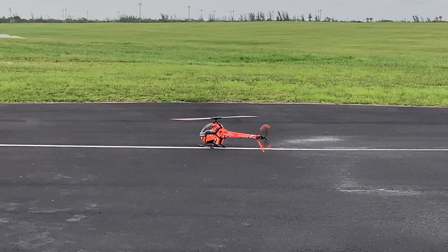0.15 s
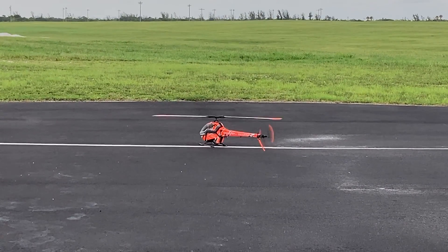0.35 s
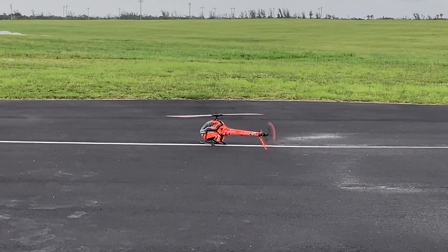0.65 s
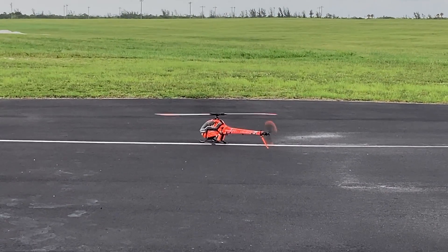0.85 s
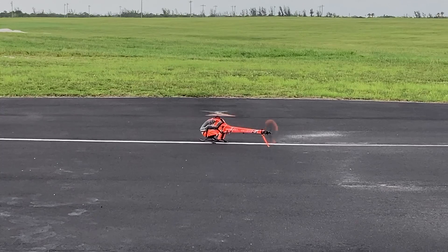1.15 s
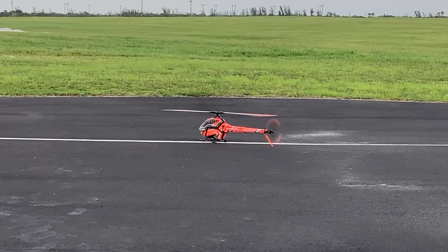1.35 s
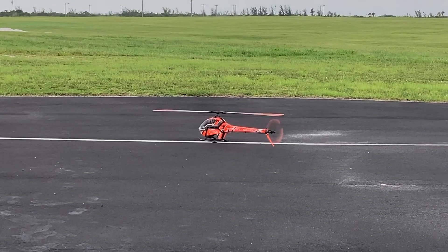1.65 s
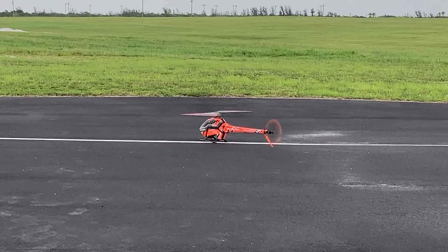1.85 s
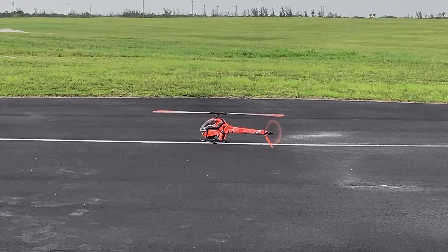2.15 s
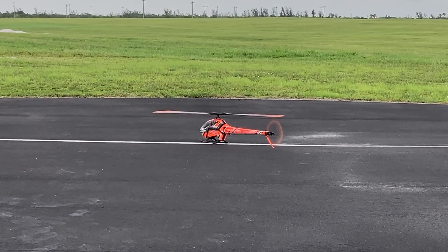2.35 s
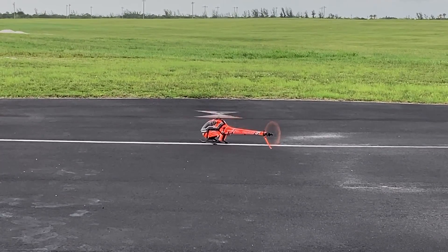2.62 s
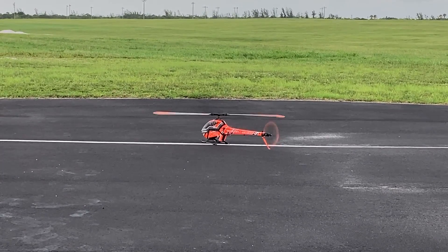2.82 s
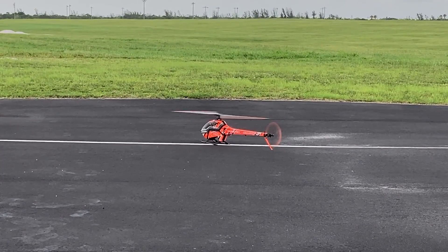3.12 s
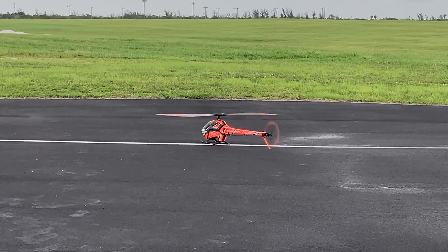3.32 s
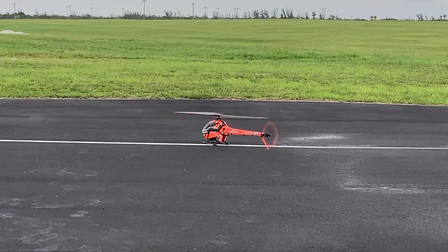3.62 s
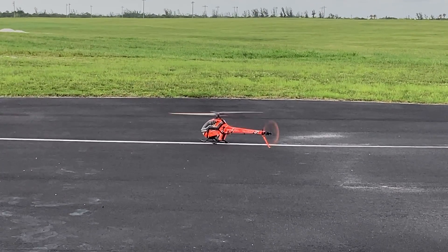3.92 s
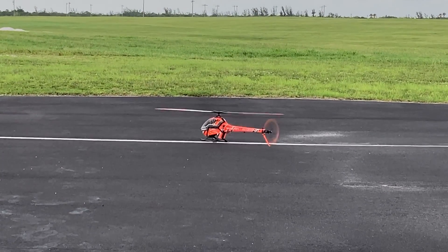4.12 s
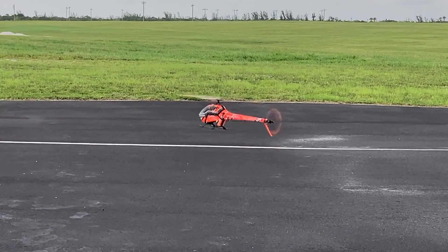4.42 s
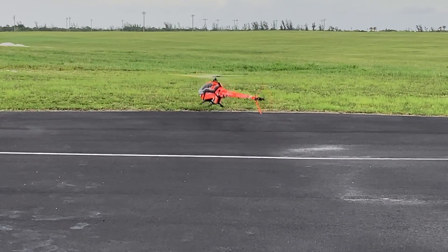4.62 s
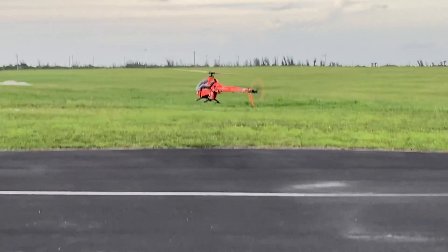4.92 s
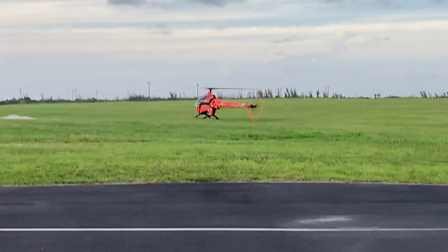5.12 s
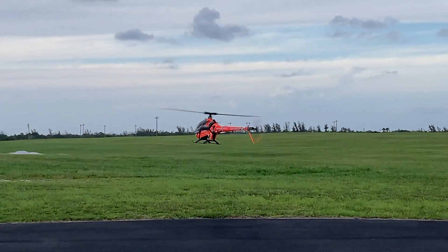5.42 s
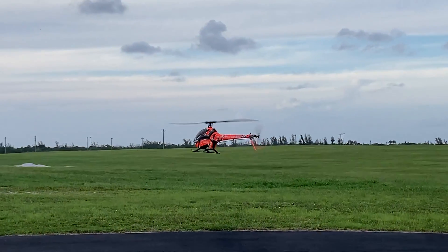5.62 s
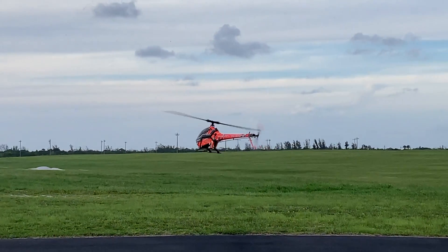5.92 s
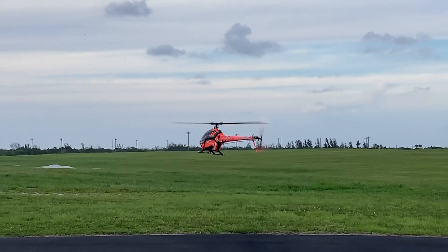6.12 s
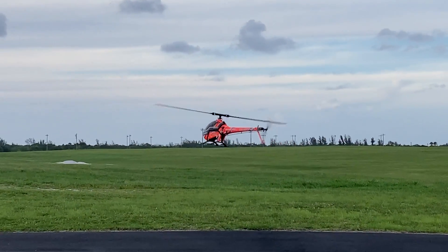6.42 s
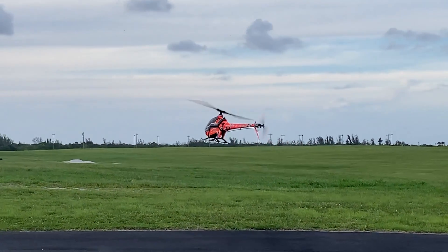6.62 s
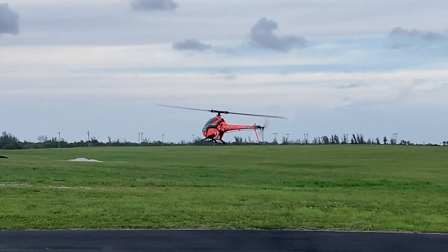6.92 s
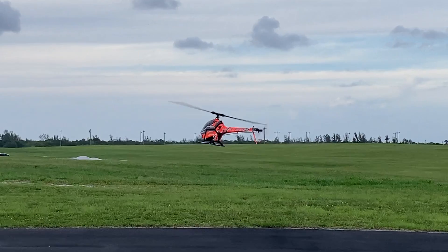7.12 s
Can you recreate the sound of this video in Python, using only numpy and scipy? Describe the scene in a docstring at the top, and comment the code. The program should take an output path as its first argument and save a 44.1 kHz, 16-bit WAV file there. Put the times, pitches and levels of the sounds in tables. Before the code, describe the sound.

Outdoors on an open, windy airfield, a small electric helicopter spools up several metres away. Its motor and gear whine climbs in pitch while whistling blades and airy hiss grow. Just after four seconds it lifts off with a harsh, growling surge, then holds a steady whine with fluttering blade chop. Wind rumbles, flutters and pops on the small stereo microphone throughout.

```python
"""On a windy airfield an electric model helicopter spools up on the tarmac, lifts off and hovers.
Motor, pinion and tail drive whine as sines at multiples of the motor speed.
The two main blades whistle as Doppler-swung narrow noise; wash, growl, rasp and hiss are coloured noise.
Gusts rumble, flutter and pop as enveloped noise on the two ports of a small microphone."""
import sys
import numpy as np
from scipy import signal
from scipy.fft import rfft, irfft, next_fast_len
from scipy.io import wavfile
from scipy.ndimage import uniform_filter1d, map_coordinates

SR = 44100
rng = np.random.default_rng(int(sys.argv[2]) if len(sys.argv) > 2 else 0)


def file_out(sig):
    """Save sig as 16-bit WAV at sys.argv[1]."""
    # one column per channel
    cols = np.atleast_2d(sig).T
    # limit, then scale
    lim = np.clip(cols, -1, 1)
    pcm = np.round(lim * 32767).astype(np.int16)
    wavfile.write(sys.argv[1], SR, pcm)


N = 320166

# All levels are relative: trims and random swings are added where they are used.
# Gusts. Each row: time in seconds, rumble level in dB, flutter in dB over the rumble.
GUSTS = [(0, -19.5, -6.5), (.26, -18.5, -11.5), (.5, -14.5, -2), (.73, -20, -11), (.96, -19.5, -12),
         (1.1, -20.5, -11.5), (1.8, -19.5, -8), (2.5, -18, -10.5), (2.75, -20, -10), (3.1, -15, -4),
         (3.5, -18.5, -6), (3.9, -15, -5), (4.05, -14.5, -0.5), (4.2, -15, 0.5), (4.4, -22.5, 0),
         (4.5, -16, -4), (4.62, -25.5, -4), (4.82, -19, -11), (5.03, -26, -6.5), (5.08, -12.5, -7),
         (5.16, -13.5, 0.5), (5.27, -15, -3), (5.42, -15.5, 6.5), (5.47, -23, -9.5), (5.55, -19, -10),
         (5.96, -18.5, -11.5), (6.44, -24, -1), (6.7, -21, -4), (6.86, -23.5, -12.5), (7.1, -18, 2),
         (7.26, -27.5, -6.5)]
# Single pops of turbulence on the ports. Each row: start in seconds, level in dB, edge in dB over it.
POPS = [(0.2, -12.5, -13), (0.309, -1.5, -28), (0.348, -8, -34), (0.502, -10.5, -34), (0.547, -9, -19),
        (0.809, -8, -39), (0.853, -10.5, -34), (0.904, -9, -38), (1.029, -9.5, -23), (1.051, -16, -14),
        (1.092, -7.5, -13.5), (1.19, -12.5, -22), (1.344, -10.5, -19), (1.584, -6.5, -39),
        (1.836, -13, -10), (1.939, -22.5, -20), (2.092, -13.5, -16), (2.15, -3, -20), (2.371, -9.5, -17),
        (2.482, -10, -16), (2.814, -10.5, -15), (2.862, -9, -33), (2.926, -5.5, -23), (3.16, -10, -7.5),
        (3.316, -13, -5), (3.732, -8, -28), (3.86, -5.5, -15), (3.953, -8, -8), (3.986, -8, -7.5),
        (4.018, -3, -8.5), (4.131, -13, 6.5), (4.145, -7, 1.5), (4.277, -7.5, -13.5), (4.359, -10, -8),
        (4.545, -13.5, -20), (4.751, -8, -12), (4.791, -3.5, -7), (4.818, -7.5, -4), (5.056, -14, -18),
        (5.137, -7.5, -15), (5.195, -11, -23), (5.252, -9, -15), (5.293, -11.5, 2.5), (5.354, -7.5, -18),
        (5.408, -18, 0), (5.855, -12.5, -22), (5.96, -11, -22), (6.421, -20, 3), (6.978, -33.5, 20.5),
        (7.157, -7.5, -5)]
# Wind spectra: rumble, flutter, then low, middle and upper part of a pop.
# Each row: frequency in Hz, density in dB per Hz.
RUMBLE_SPECTRUM = [(12, -41), (20, -18), (47, -4), (75, 4), (300, -17), (390, -27), (660, -120)]
FLUTTER_SPECTRUM = [(90, -23), (170, -2), (300, -4.5), (500, -9.5), (700, -18), (1200, -26)]
THUD_SPECTRUM = [(90, -5.5), (160, -0.5), (280, -3.5), (400, -34)]
SLAP_SPECTRUM = [(200, -23), (330, 3.5), (550, -3), (750, -15), (1000, -17.5)]
EDGE_SPECTRUM = [(600, -2), (1000, 9.5), (1600, 2.5), (2600, -6), (4500, -29)]
# Likeness of the wind at the two ports. Each row: frequency in Hz, likeness from 0 to 1.
WIND_LIKENESS = [(340, 1), (460, 0.98), (610, 0.53), (820, 0.0084)]
QUADRATURE = 0.53  # share of the wind's left-right difference that is a phase shift

# Motor speed. Each row: time in seconds, turns per second.
MOTOR_SPEED = [(0.0, 78.6), (0.36, 87.4), (0.67, 97.6), (1.06, 113.7), (1.3, 117.1), (1.42, 125.3),
               (1.48, 131.3), (1.77, 139.6), (2.1, 143.0), (2.42, 158.1), (2.85, 166.1), (3.38, 192.8),
               (3.75, 203.5), (4.23, 225.0), (4.5, 259.6), (4.68, 261.5), (5.31, 245.9), (5.47, 244.2),
               (5.8, 248.3), (6.2, 244.9), (6.34, 252.3), (7.26, 246.1)]
# Blade load. Each row: time in seconds, load in dB, rasp in dB over its law.
BLADE_LOAD = [(0, -0.5, -2), (.25, 3, 1), (1.3, 2.5, -3), (1.6, 6.5, -5), (2, 2, -2.5), (3.3, 4, -1),
              (4, 4, -1.5), (4.25, 4, 0.5), (4.38, 12, -3), (4.55, 7, 4.5), (4.7, 0.5, 0.5), (5.4, 0.5, 1),
              (5.85, 4.5, 2), (6.15, 1, 0.5), (6.38, 7, -0.5), (6.62, 3, -1), (7, 3.5, 0), (7.26, 4, 3)]
ROTOR_GEAR = 7 / 72  # rotor turns per motor turn
INERTIA_S = .11  # the rotor rounds off every change of speed
HOVER_TURNS = 250  # motor turns per second
LIFT_S, LIFT_TAKES_S = 4.35, .1

# Blade noise spectra: wash, growl of blades at full bite, gear rasp, blade hiss.
# Each row: frequency in Hz, density in dB per Hz.
WASH_SPECTRUM = [(500, -35), (800, 9.5), (1100, -5), (1330, -0.5), (1530, -2), (1800, 3.5), (2100, -5.5),
                 (2800, -9.5), (3500, -60)]
GROWL_SPECTRUM = [(650, -30), (900, 4), (1120, -10), (1350, -7), (1550, -11), (1800, 2), (2000, -1),
                  (2300, -30)]
RASP_SPECTRUM = [(2400, -89), (3000, -0.5), (3800, 3), (5000, 1.5), (5500, 0), (6200, -17)]
HISS_SPECTRUM = [(4800, -39), (5700, -3), (7000, 3.5), (9500, 5.5), (12000, 6), (16000, 0)]
# Each law: dB at hover speed, dB per doubling of speed, dB per dB of load.
WASH_LAW, RASP_LAW, HISS_LAW = (-33, 6.1, 0.73), (-41.5, 7.8, 1), (-42.5, 7.8, 1)
GROWL_DB, GROWL_PER_DB = -33, 1.5  # at the highest load; dB per dB of load

# Trailing-edge whistles. Each row: multiple of motor speed,
# rotor turn at which the blade comes at the listener, level in dB.
BLADE_WHISTLES = [(61.5, .78, 0), (74, .28, -4), (80, .78, -8), (53, .28, -6)]
# Course of the whistle. Each row: time in seconds, level in dB,
# forward beaming as a power of the Doppler factor, spread in random knots per second.
WHISTLE_COURSE = [(0, -62, 23, 1210), (1.1, -53, 11, 2160), (1.5, -41, 16, 1997), (1.85, -39, 11, 1994),
                  (2.15, -42, 6, 2300), (2.5, -41.5, 5, 2406), (2.8, -37.5, 8, 2380), (3.1, -42, 12, 2500),
                  (3.7, -37, 10, 2200), (4.05, -40, 13, 2010), (4.4, -40, 1, 905), (5, -46.5, -0.5, 504),
                  (6.3, -43, 1.5, 508), (7.26, -48, -6, 456)]

# Strong tones in multiples of motor speed; the pinion has 21 teeth, the motor 10 poles.
STRONG_ORDERS = [21 / 4, 7, 10, 21 / 2, 63 / 5, 15, 63 / 4, 21, 30, 42, 15 / 2]
# Levels of those tones. Each row: dB on the ground at hover speed, dB per doubling of speed, dB in the air.
STRONG_LEVELS = [(-29.5, -26, -48.5), (-73, 0, -64), (-60, -2, -54), (-56, -6, -54), (-46, 23, -55),
                 (-63.5, -10, -98), (-60, -5, -51), (-53, 7, -52), (-68, -6.5, -84), (-52, 17, -54),
                 (-66, -4, -50)]
# Fainter tones. Each row: multiple of motor speed, dB at the start, dB before lift-off, dB in the air.
FAINT_TONES = [(20, -53, -73, -58), (22, -73, -53, -70), (23, -63, -76, -72), (40, -76, -66, -53),
               (62, -81, -56, -70), (53, -99, -62, -70), (18, -57, -81, -80), (25, -56, -80, -82),
               (45, -67, -78, -80)]
# Commutation overtones. Each row: multiple of the pole-pair rate, level in dB.
COMMUTATION_TONES = [(25, -66), (27, -58.5), (28, -71), (29, -54), (30, -65), (31, -60), (33, -64),
                     (35, -70)]
# Resonances of the frame on the tarmac. Each row: frequency in Hz, gain in dB.
FRAME_RESONANCES = [(850, -37), (1350, -12.5), (1550, -18), (1750, 7), (1950, 10), (2150, 0), (2350, 5.5),
                    (2650, -0.5), (2880, -6.5), (3200, 14), (3500, -4), (3900, 10.5), (4300, -3), (5300, 3),
                    (6800, 6.5), (8800, -2)]
# Tones that stand out for a while. Each row: multiple of motor speed, start and end in seconds, level in dB.
TONE_SWELLS = [(30, 0, .14, -50), (30, .72, .92, -53), (30, .94, 1.05, -43), (30, 1.03, 1.34, -52),
               (21, 0, .35, -46), (21, .5, .6, -47), (21, .6, .78, -51), (63 / 4, .62, 1.35, -47),
               (15, 1, 1.38, -49), (21, .9, 1.05, -43), (21, 2.2, 2.36, -48), (21, 1.33, 1.5, -47),
               (30, 1.42, 1.5, -53), (63 / 5, 1.48, 1.65, -46), (63 / 5, 1.68, 2.14, -37),
               (63 / 4, 1.98, 2.2, -46), (21 / 2, 2.18, 2.6, -38.5), (21 / 2, 2.8, 3.3, -38.5),
               (63 / 5, 3.18, 3.33, -48), (21 / 2, 3.38, 4.03, -44), (42, 3.4, 3.8, -54),
               (21, 3.55, 3.84, -47), (10, 4.17, 4.24, -34), (10, 4.24, 4.325, -30),
               (21 / 4, 4.38, 4.58, -35), (7, 4.37, 4.53, -33), (63 / 4, 4.33, 4.43, -38),
               (63 / 4, 4.46, 4.56, -45), (21, 4.43, 4.51, -35), (7, 4.72, 5.08, -41),
               (15 / 2, 4.87, 4.95, -39), (21 / 4, 4.82, 5.35, -35), (42, 4.55, 5.35, -48),
               (42, 5.45, 5.72, -48), (42, 6.3, 6.5, -49), (42, 7, 7.26, -50), (10, 5.02, 5.6, -34.5),
               (10, 5.6, 5.75, -40), (21 / 2, 5.0, 5.23, -39), (21, 5.2, 5.4, -45),
               (21 / 4, 5.35, 6.5, -41), (15, 5.88, 6.32, -52), (7, 5.8, 6.25, -46), (7, 6.6, 7.02, -43),
               (7, 7.18, 7.26, -44), (21, 5.45, 6.25, -50), (21, 6.3, 6.7, -47), (10, 6.25, 6.45, -47),
               (21 / 2, 6.5, 7.2, -44), (10, 6.62, 7.26, -41), (21, 6.85, 7.26, -45)]
RISE_DB_PER_S, FALL_DB_PER_S = 170, 350
# Noisy skirt of a tone: share, growth per dB of load above 7 dB, random knots per second.
ROUGH, ROUGH_PER_DB, ROUGH_KNOTS = .2, .14, 170

# Phase between the ports. Each row: frequency in Hz, radians by which left leads.
PORT_LEAD = [(1290, -.2), (2760, .1), (3100, 2), (4900, 2.1), (5250, 2.6), (5940, 3), (6460, .3),
             (7490, -.6), (8790, -2.9), (9560, -3.3), (11100, -6.2), (11600, -6.3), (13200, -9.3),
             (13900, -9.5), (15200, -12.4), (16000, -12.6)]
# Level between the ports. Each row: frequency in Hz, left over right in dB.
PORT_LEVEL = [(700, 3), (1100, -1), (1900, -1.5), (2600, -2), (3300, -7.5), (4200, -3.5), (5200, -2),
              (6300, 1), (8000, -0.5)]
# Added lead once the helicopter has drifted aside. Each row: frequency in Hz, radians.
DRIFT_LEAD = [(4500, 0.28), (5200, 0.56), (5900, 0.23), (6500, 0)]
DRIFT_S, DRIFT_TAKES_S = 6.53, .2
MONO_HZ, TOP_HZ = 230, 15750  # bass below is kept in the middle; band limit


def amp(db):
    """A level in dB is a logarithmic ratio; this returns the amplitude gain."""
    return 10 ** (np.asarray(db) / 20)


def unit(x):
    """Normalization by mean power brings a signal to rms 1."""
    return x / np.sqrt(np.mean(x ** 2) + 1e-20)


def along(points, hz):
    """Frequency responses are interpolated on a logarithmic frequency axis."""
    f, v = np.transpose(points)
    return np.interp(np.log(hz + 1), np.log(f + 1), v)


def curves(rows):
    """Slow parameters are interpolated linearly in time, one curve for each column after the time."""
    s, *cols = np.transpose(rows)
    return [np.interp(np.arange(N) / SR, s, c) for c in cols]


def wobble(rate):
    """Random modulation joins normal values by straight lines, rate (at most 60) knots a second."""
    knots = rng.standard_normal(int(N * 60 / SR) + 4)
    return map_coordinates(knots, [np.arange(N) * min(rate, 60) / SR], order=1)


def filtered(x, response):
    """Linear filtering multiplies the spectrum by a complex frequency response."""
    m = next_fast_len(N + 8192)
    return irfft(rfft(x, m) * response(np.fft.rfftfreq(m, 1 / SR)), m)[..., :N]


def noise(spectrum, channels=1):
    """Coloured noise is white noise shaped by a spectral density, here at rms 1 and closed at both ends."""
    closed = [(spectrum[0][0] / 2, -120), *spectrum, (spectrum[-1][0] * 2, -120)]
    white = rng.standard_normal((channels, N))
    return unit(filtered(white, lambda hz: amp(along(closed, hz))))


def pops(s, db, attack, t60):
    """An impulse train convolved with a rise and an exponential decay gives the envelope of the pops."""
    t = np.arange(SR // 5) / SR
    starts = np.bincount(np.round(s * SR).astype(int), amp(db), N)[:N]
    return signal.fftconvolve(starts, amp(-60 * t / t60) * (1 - np.exp(-t / attack)))[:N]


def wind():
    """Turbulent eddies press on the ports: rumble, spikier flutter and ragged pops, alike only in the bass."""
    rumble_db, flutter_db = curves(GUSTS)
    eddy = wobble(22)
    rumble_swing = amp(2.37 * eddy + 0.2 * wobble(4.5))
    rumble = amp(rumble_db + 2.0) * unit(rumble_swing * noise(RUMBLE_SPECTRUM))
    flutter_swing = amp(6.56 * eddy + 2.4 * wobble(45))
    flutter = amp(rumble_db + flutter_db - 6.5) * unit(flutter_swing * noise(FLUTTER_SPECTRUM, channels=2))

    when, size = rng.random((170, 2)).T  # many small pops that follow the gusts
    at = (when * (N - 1)).astype(int)
    small_db = (rumble_db + flutter_db)[at] + 1.5 - 4 * np.log(size + 0.12)
    s, db, edge_db = np.transpose(POPS)
    every_s = np.r_[s, at / SR]
    every_db = np.r_[db, small_db]
    every_edge_db = np.r_[db + edge_db - 3, small_db - 27]
    # the treble dies first
    thud = pops(every_s, every_db - 6, attack=0.004, t60=0.085) * noise(THUD_SPECTRUM)
    slap = pops(every_s, every_db - .3, attack=0.004, t60=0.048) * noise(SLAP_SPECTRUM, channels=2)
    edge = pops(every_s, every_edge_db, attack=0.0015, t60=0.037) * noise(EDGE_SPECTRUM, channels=2)

    def turn(hz):
        """The angle between middle and side sets the correlation of the two ports."""
        return np.arccos(np.clip(along(WIND_LIKENESS, hz), -1, 1)) / 2 * (hz > 250)

    mid, side = filtered(flutter + slap + edge, lambda hz: np.array([np.cos(turn(hz)), np.sin(turn(hz))]))
    shifted = filtered(mid, lambda hz: 1j * np.minimum(np.tan(turn(hz)), 2))
    side = np.sqrt(1 - QUADRATURE) * side + np.sqrt(QUADRATURE) * shifted
    return rumble + thud + np.array([mid + side, mid - side])


def torn_air(motor, load_db, extra_db, chop):
    """Turbulent wash, gear rasp and hiss grow with speed and load; the blade passages modulate them."""
    wash_db, rasp_db, hiss_db = (db + faster * np.log2(motor / HOVER_TURNS) + harder * load_db
                                 for db, faster, harder in (WASH_LAW, RASP_LAW, HISS_LAW))
    rasp_db = rasp_db + extra_db
    load = np.clip((wash_db + 38) / 7, 0, 1.3)  # blades that bite harder chop harder
    chop = load * chop
    hiss = noise(HISS_SPECTRUM, channels=3)
    top = filtered(hiss, lambda hz: 1 / (1 + (11500 / (hz + 1)) ** 6))
    hiss = hiss - np.clip(2.65 - motor / 65, 0, .78) * top  # slow tips hiss duller
    air = amp(wash_db - 4 + 2 * wobble(12)) * (1 + 1.7 * chop) * noise(WASH_SPECTRUM, channels=3)
    air += amp(rasp_db - 2.5 + 1.8 * wobble(12)) * (1 + 0.54 * chop) * noise(RASP_SPECTRUM, channels=3)
    air += amp(hiss_db - 1.5 + .6 * wobble(12)) * (1 + .3 * chop) * hiss
    return air, chop


def growl(load_db, chop):
    """Loaded blades radiate a broadband growl that enters at lift-off and rises with the load."""
    growl_db = GROWL_DB + GROWL_PER_DB * (load_db - load_db.max()) + 3.3 * wobble(60)
    aloft = np.clip((np.arange(N) / SR - LIFT_S) / LIFT_TAKES_S + .5, 0, 1)
    return aloft * amp(growl_db) * (1 + chop) * noise(GROWL_SPECTRUM)[0]


def whistles(rotor_turns, motor):
    """Trailing edges shed narrow noise; the Doppler effect of the circling source swings pitch and level."""
    db, beaming, spread = curves(WHISTLE_COURSE)
    mach = .00133 * motor  # tip speed over the speed of sound
    out = np.zeros(N)
    for order, facing, blade_db in BLADE_WHISTLES:
        doppler = 1 / (1 - mach * np.cos(2 * np.pi * (rotor_turns - facing)))
        carrier = 2 * np.pi * np.cumsum(order * motor * doppler) / SR
        knots = np.cumsum(spread) / SR
        a, b = (map_coordinates(rng.standard_normal(int(knots[-1]) + 4), [knots]) for _ in "ab")
        heard = order * motor * doppler < SR / 2.2
        loudest = np.where(beaming > 0, 1 - mach, 1 + mach)
        swing = (doppler * loudest) ** beaming * amp(2 * wobble(25))
        out += amp(db + blade_db) * heard * swing * (a * np.cos(carrier) + b * np.sin(carrier))
    return out


def tone_db(order, ground_db, faster_db, air_db, motor):
    """Frame resonances rule a tone on the ground, a steady level in the air; swells stand above both."""
    t, motor = np.arange(0, N, 128) / SR, motor[::128]
    aloft = np.clip((t - LIFT_S) / LIFT_TAKES_S, 0, 1)
    resonance_db = along(FRAME_RESONANCES, order * motor)
    ground_db = ground_db + faster_db * np.log2(motor / HOVER_TURNS) + resonance_db
    db = (1 - aloft) * ground_db + aloft * air_db
    db += np.interp(t * 5, np.arange(40), rng.normal(0, 3, 40))  # slow fading
    for k, start, end, top_db in TONE_SWELLS:
        if abs(k / order - 1) < .02:
            rise_db = RISE_DB_PER_S * np.maximum(start - t, 0)
            fall_db = FALL_DB_PER_S * np.maximum(t - end, 0)
            db = np.maximum(db, top_db - rise_db - fall_db)
    return np.interp(np.arange(N) / SR, t, db)


def tone(order, motor, db, rough=ROUGH):
    """A rotating part sounds a sine locked to its speed; random modulation makes it flare and tremble."""
    turns = np.cumsum(motor) / SR
    level = amp(db - 1 + 2 * wobble(28) + .8 * wobble(9)) * (order * motor < TOP_HZ)
    knots = rng.standard_normal((2, int(N * ROUGH_KNOTS / SR) + 2))
    a, b = (np.interp(np.arange(N) * ROUGH_KNOTS / SR, np.arange(len(r)), r) for r in knots)
    phase = 2 * np.pi * order * turns + 0.75 * wobble(30)
    rough_sine = (1 + rough * a) * np.sin(phase) + rough * b * np.cos(phase)
    return np.sqrt(2 / (1 + rough ** 2)) * level * rough_sine


def drive(motor, load_db):
    """Gear mesh, tail drive and poles excite multiples of the motor speed; commutation fades with time."""
    t = np.arange(N) / SR
    rough = ROUGH + ROUGH_PER_DB * np.maximum(load_db - 7, 0)
    out = np.zeros(N)
    for k, db in zip(STRONG_ORDERS, STRONG_LEVELS):
        out += tone(k, motor, tone_db(k, *db, motor), rough)
    for k, *db in FAINT_TONES:
        out += tone(round(k), motor, np.interp(t, [0, 3.5, 4.5], db) + 2 * wobble(1.2), rough=0.78)
    for k, db in COMMUTATION_TONES:  # five pole pairs; falls 26 dB a second
        out += tone(5 * round(k), motor, db + 6 - 26 * t + 5 * wobble(8))
    return out


def helicopter():
    """One motor speed governs tones, whistles and torn air, which throbs at the blade-passing rate."""
    motor = uniform_filter1d(curves(MOTOR_SPEED)[0], size=round(INERTIA_S * SR), mode="nearest")
    load_db, extra_db = curves(BLADE_LOAD)
    rotor_turns = np.cumsum(motor) / SR * ROTOR_GEAR
    # two pulses a rotor turn
    passing = amp(2.14 * wobble(45)) * np.exp(8 * (np.cos(4 * np.pi * (rotor_turns - .28)) - 1))
    air, chop = torn_air(motor, load_db, extra_db, passing)
    near = drive(motor, load_db) + whistles(rotor_turns, motor) + growl(load_db, chop)
    return near + 0.81 * air[0], 0.2 * air[1:]  # the direct sound; what ground and air scatter to each port


def ports(x, drift):
    """Two spaced ports receive one wave at different phase and level; the low end is cut."""
    side = np.array([[.5], [-.5]])

    def response(hz):
        """Each port takes half of the level and phase difference."""
        lead = along(PORT_LEAD, hz) + drift * along(DRIFT_LEAD, hz)
        low_cut = 1 + (850 / (hz + 1)) ** 8
        return amp(side * along(PORT_LEVEL, hz)) * np.exp(1j * side * lead) / low_cut

    return filtered(x, response)


def scene():
    """Sound pressures superpose: the helicopter through the ports, drifting aside, and the wind."""
    direct, scattered = helicopter()
    aside = np.clip((np.arange(N) / SR - DRIFT_S) / DRIFT_TAKES_S, 0, 1)
    heard = direct + scattered
    return ports((1 - aside) * heard, drift=0) + ports(aside * heard, drift=1) + wind()


def record(dry):
    """Saturation rounds off the peaks; the bass becomes mono and nothing is kept above the band limit."""
    soft = dry / (1 + np.abs(dry / .93) ** 8) ** (1 / 8)
    mid, side = (soft[0] + soft[1]) / 2, (soft[0] - soft[1]) / 2
    side = filtered(side, lambda hz: 1 / (1 + (MONO_HZ / (hz + 1)) ** 12))
    return filtered(np.array([mid + side, mid - side]), lambda hz: hz < TOP_HZ)


dry = scene()
out = record(dry)
file_out(out)
```